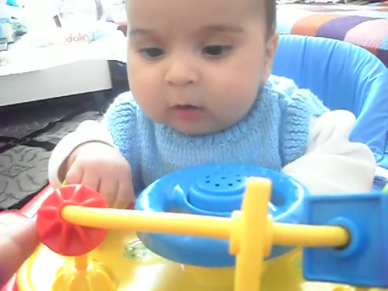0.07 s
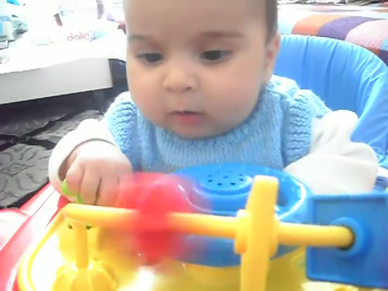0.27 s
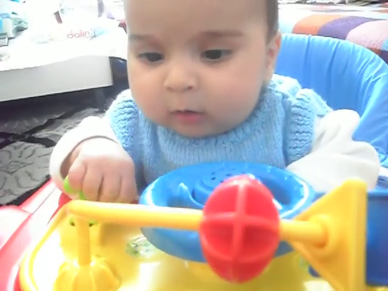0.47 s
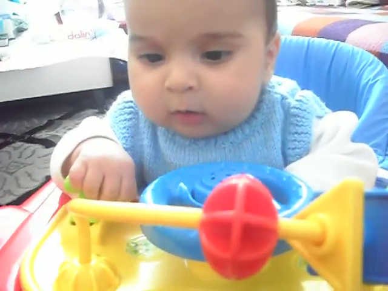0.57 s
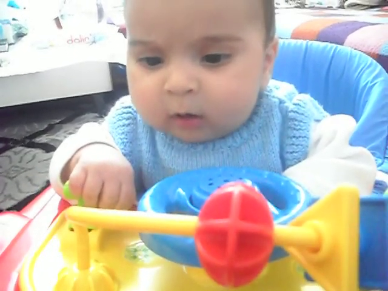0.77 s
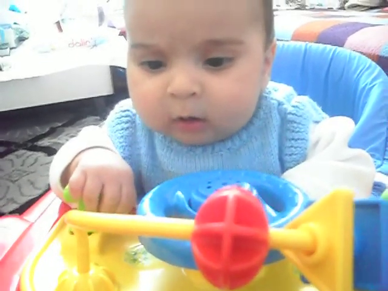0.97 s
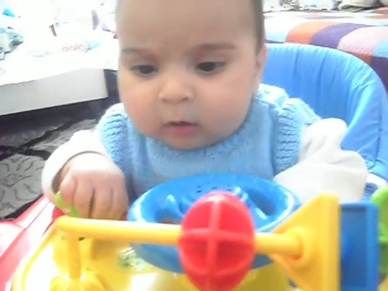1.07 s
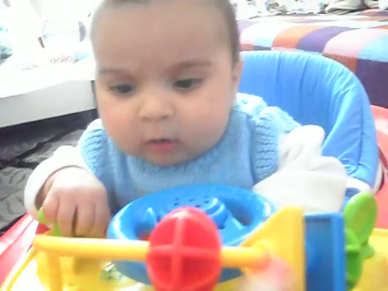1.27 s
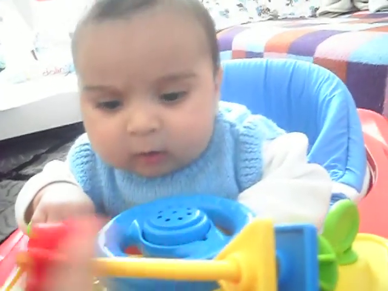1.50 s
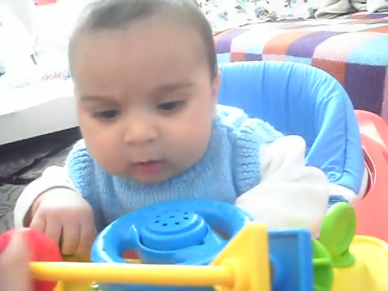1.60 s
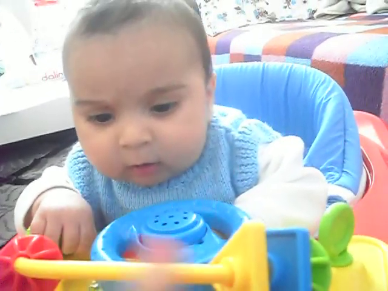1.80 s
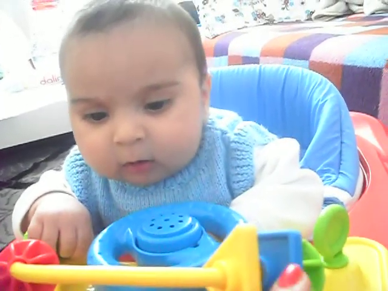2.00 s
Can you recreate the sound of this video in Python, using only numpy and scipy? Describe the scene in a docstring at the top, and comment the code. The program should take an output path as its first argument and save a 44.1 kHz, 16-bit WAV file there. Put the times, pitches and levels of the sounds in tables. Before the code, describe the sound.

Plastic bead sliding on a baby toy, clattering with two sharp snaps, then rattling back.

```python
"""A camera's faint hiss, thin whine and electrical flutter at its frame rate sound throughout.
Close by, a plastic bead is flicked along the bar of a baby's toy tray, snaps against its neighbours
and the end stop, and is later pushed back. Its friction and impacts drive the resonant modes of the
hollow tray, and a small furnished room adds a short reverberation."""
import sys
import numpy as np
from scipy import signal
from scipy.fft import rfft, irfft
from scipy.io import wavfile
from scipy.ndimage import uniform_filter1d

SR = 44100
rng = np.random.default_rng(int(sys.argv[2]) if len(sys.argv) > 2 else 0)


def transcribe(signal):
    """Save signal, clipped to [-1, 1], as a 16-bit WAV file at the path in sys.argv[1]."""
    frames = np.atleast_2d(signal).T
    limited = np.clip(frames, -1, 1)
    pcm = np.round(limited * 32767).astype(np.int16)
    wavfile.write(sys.argv[1], SR, pcm)


N = 90404

# Spectrum of the room's bright reverberation. Each row: frequency in Hz, relative level in dB.
BRIGHT_REVERB = [(400, -26), (900, 1), (1800, 1.5), (4500, 5.5), (7000, -2.5), (10000, -1)]


def from_db(db):
    """Amplitude grows tenfold for every 20 dB."""
    return 10 ** (np.asarray(db) / 20)


def rms_one(x):
    """Normalisation to unit mean power."""
    return x / np.sqrt(np.mean(x ** 2) + 1e-20)


def coloured(spectrum, size):
    """Spectral shaping of white noise, at unit rms."""
    hz, db = np.transpose(spectrum)
    bin_hz = np.fft.rfftfreq(size, 1 / SR)
    gain = from_db(np.interp(np.log(bin_hz + 1), np.log(hz), db))
    return rms_one(irfft(rfft(rng.standard_normal(size)) * gain, size))


def noise_band(hz, width_hz):
    """Band-pass filtering of white noise, at unit rms."""
    band = signal.butter(2, [hz - width_hz / 2, hz + width_hz / 2], "band", fs=SR, output="sos")
    return rms_one(signal.sosfilt(band, rng.standard_normal(N)))


def ring(force, hz, t60):
    """A damped oscillator answers an impulse with a sine that falls 60 dB in t60 seconds."""
    decay, step = from_db(-60 / (t60 * SR)), 2 * np.pi * hz / SR
    return signal.lfilter([0, np.sin(step)], [1, -2 * decay * np.cos(step), decay ** 2], force + 1e-18)


def diffuse(x, spectrum, t60):
    """Densely overlapping modes act as a convolution with decaying noise of unit energy."""
    tail = coloured(spectrum, size=SR // 2) * from_db(-60 * np.arange(SR // 2) / SR / t60)
    return signal.fftconvolve(x, tail / np.linalg.norm(tail))[:N]


def delayed(x, s):
    """A propagation delay of s seconds."""
    return np.pad(x, (int(s * SR), 0))[:N]


def click(s, db):
    """An ideal impulse at s seconds excites all frequencies equally."""
    return from_db(db) * (np.arange(N) == int(s * SR))


def camera_noise(frame_hz=29.97, first_burst_s=0.0109, burst_s=0.012):
    """Periodic interference adds a throb and a burst of fizz at each frame to steady hiss and whine."""
    # Hiss and rumble. Each row: frequency in Hz, relative spectral density in dB.
    hiss_spectrum = [(15, -3), (40, -7), (90, -7.5), (200, -12.5), (300, -16.5), (420, -23), (1500, -29),
                     (4000, -32.5), (7500, -35), (9300, -30), (10200, -38), (11000, -52), (12000, -59)]
    # Each row: multiple of the frame rate, peak level in dB.
    hum_harmonics = [(1, -43.5), (2, -51), (4, -69)]
    # Each row: frequency in Hz, rms level in dB.
    whine_tones = [(7140, -66.5), (7870, -73.5)]
    t = np.arange(N) / SR
    frames = (t - first_burst_s) * frame_hz
    hum = sum(from_db(db) * np.cos(2 * np.pi * k * frames) for k, db in hum_harmonics)
    in_burst = np.abs(frames - np.round(frames)) < burst_s * frame_hz / 2
    gate = uniform_filter1d(in_burst.astype(float), size=64)
    fizz = from_db(-59) * noise_band(8990, width_hz=630)
    flutter = from_db(-59.5) * noise_band(224, width_hz=155)
    whine = sum(from_db(db) * np.sqrt(2) * np.sin(2 * np.pi * hz * t) for hz, db in whine_tones)
    hiss = from_db(-50.5) * coloured(hiss_spectrum, size=N)
    return hiss + hum + gate * (fizz + flutter) + whine


def slide(envelope, bright_hz, thin_hz, catches_per_s=1100, spread_db=3):
    """Stick-slip friction: the bead catches on the bar in tiny random impulses that ring the tray."""
    s, db = np.transpose(envelope)
    level = from_db(np.interp(np.arange(N) / SR, s, db, left=-120, right=-120))
    catches = (rng.random(N) < catches_per_s / SR) * rng.choice([-1, 1], N)
    strengths = from_db(spread_db * np.clip(rng.standard_normal(N), -2, 2))
    force = contact(catches * strengths * level, bright_hz, thin_hz)
    return rms_one(tray([force])) * np.sqrt(np.mean(level ** 2))


def contact(force, bright_hz, thin_hz, crisp_db=-33.5):
    """Contact filters a force: a soft one loses nearly all its treble, a light one stirs little bass."""
    soft = signal.butter(2, bright_hz, fs=SR)
    light = signal.butter(1, thin_hz, "high", fs=SR)
    cushioned = signal.lfilter(*soft, force + 1e-18)
    return signal.lfilter(*light, cushioned - from_db(crisp_db) * force)


def tray(forces, spots=5, spread_db=4.5):
    """Modal superposition: each force rings the tray in a random mix, as its point of contact varies."""
    # Modes of the tray and its bar. Each row: frequency in Hz, gain in dB, 60 dB decay time in seconds.
    tray_modes = [(260, -17, 0.11), (469.8, -14, 0.21), (500, -5.5, 0.029), (637, -8, 0.026),
                  (809, -6, 0.019), (931, -11, 0.031), (1182, -16, 0.017), (1355, -26, 0.025),
                  (1495, -12, 0.029), (1773, -22, 0.032), (2032, -19.5, 0.045), (2132, -13.5, 0.017),
                  (2650, -30, 0.017), (3570, -12.5, 0.004)]
    # The plastic's dense overtones. Each row: frequency in Hz, relative spectral density in dB.
    overtone_spectrum = [(150, -5), (400, 1.5), (900, 0.5), (1600, -1.5), (2300, -3.5), (3000, -8.5),
                         (5000, -6.5), (7000, -9.5), (10000, -3)]
    coupling = from_db(spread_db * rng.standard_normal((len(forces), len(tray_modes))))
    drives = coupling.T @ np.array(forces)
    ringing = sum((-1) ** ((k + 1) // 2) * from_db(db) * ring(drives[k], hz, t60)  # signs flip in pairs
                  for k, (hz, db, t60) in enumerate(tray_modes))
    overtones = sum(diffuse(sum(forces[spot::spots]), overtone_spectrum, t60=0.016)
                    for spot in range(min(spots, len(forces))))
    radiation = signal.butter(4, 216, "high", fs=SR, output="sos")  # a small shell radiates little bass
    return signal.sosfilt(radiation, ringing + from_db(18.5) * overtones)


def knocks(rebound_s=0.00302, rebound_db=-7):
    """Inelastic impact: the loose bead hits the bar and stops, rebounding once after an uneven delay."""
    # Each row: start in seconds, strength in dB, treble cutoff in Hz, bass cutoff in Hz.
    bead_impacts = [(0.2027, -25.5, 850, 408), (0.2108, -29.5, 600, 250), (.2325, -23, 1310, 700),
                    (0.2484, -18.5, 1420, 400), (.2625, -16.5, 1950, 720), (0.2729, -26, 5140, 1300),
                    (0.3361, -20, 2200, 203), (0.3396, -17.5, 2150, 410), (.352, -19.5, 2200, 500),
                    (.3665, -22, 1480, 300), (.3765, -22.5, 1600, 393), (0.3874, -26, 2180, 296),
                    (0.4034, -14.5, 1970, 125), (.429, -25.5, 1610, 500), (0.445, -26, 1230, 304),
                    (1.3759, -32.5, 1610, 600), (1.4029, -33.5, 1560, 700), (1.413, -33.5, 3000, 704),
                    (1.4321, -23.5, 2380, 250), (1.442, -30, 6400, 1290), (1.529, -28, 2630, 1190),
                    (1.5376, -32, 1460, 800), (1.545, -31, 4870, 1290), (1.5695, -35, 1400, 800),
                    (1.576, -22.5, 1410, 890), (1.591, -26.5, 1280, 700), (1.6006, -38, 1700, 790),
                    (1.618, -17.5, 1140, 990), (1.6222, -18.5, 1080, 900), (1.6556, -34, 1190, 600),
                    (1.6985, -28, 920, 401), (1.7064, -21.5, 2600, 690), (1.7100, -15.5, 820, 314),
                    (1.7255, -27.5, 1160, 500), (1.747, -33, 720, 300)]
    gaps = rebound_s * rng.uniform(0.502, 1.306, len(bead_impacts))
    return tray([contact(click(s, db) + click(s + gap, db + rebound_db), bright_hz, thin_hz)
                 for (s, db, bright_hz, thin_hz), gap in zip(bead_impacts, gaps)])


def snaps(t60=0.0025):
    """Hard impact excites the bead's own brief modes; early reflections and a short sizzle follow."""
    # Plastic edges meet at the bar's end. Each row: start in seconds, level in dB, low, middle and
    # edge modes in Hz, the edge mode's relative level in dB and its 60 dB decay time in seconds.
    hard_impacts = [(0.3347, -10, 3870, 5500, 9400, -0.5, 0.0017),
                    (.402, -8.5, 3100, 5470, 7080, 0.5, 0.0045)]
    # Reflections from near surfaces. Each row: delay in seconds, gain in dB.
    near_reflections = [(.0028, -14.5), (.0083, -19.5), (0.014, -22)]
    direct, blows = np.zeros((2, N))
    for s, db, low_hz, middle_hz, edge_hz, edge_db, edge_t60 in hard_impacts:
        blow = click(s, db)
        direct += ring(blow, low_hz, t60) - ring(blow, middle_hz, t60)
        direct += from_db(edge_db) * ring(blow, edge_hz, edge_t60)
        blows += blow
    force = contact(blows, bright_hz=10600, thin_hz=3000)
    sizzle = from_db(0.5) * diffuse(force, BRIGHT_REVERB, t60=0.15)
    echoes = sum(from_db(db) * delayed(direct, s) for s, db in near_reflections)
    return direct + sizzle + echoes


def wisp(peak_s=1.103, half_width_s=0.01):
    """A Gaussian envelope on narrow-band noise gives one faint, high fizz while the bead rests."""
    swell = np.exp(-((np.arange(N) / SR - peak_s) / half_width_s) ** 2)
    return from_db(-57) * swell * noise_band(9900, width_hz=990)


def room(x):
    """Diffuse reverberation, which lasts longer in the low range than in the high."""
    # Spectrum of the dark reverberation. Each row: frequency in Hz, relative level in dB.
    dark_reverb = [(150, 1.5), (280, 2), (470, -1.5), (800, -1), (1500, -18.5), (3000, -24)]
    low = from_db(-25.5) * diffuse(x, dark_reverb, t60=0.35)
    high = from_db(-10.5) * diffuse(x, BRIGHT_REVERB, t60=0.24)
    return delayed(low + high, s=0.004)


def microphone(x, edge_hz=10000, shelf_db=-24.5):
    """A shelving response: the top treble falls away to a low, level remainder."""
    low_pass = signal.butter(12, edge_hz, fs=SR, output="sos")
    return signal.sosfilt(low_pass, x) + from_db(shelf_db) * x


def scene():
    """Superposition of the toy, its reverberation and the background noise, in one channel."""
    # Rubbing envelopes of the flick out and the push back. Each row: time in seconds, level in dB.
    outward_envelope = [(.188, -59), (.202, -37), (.225, -41.5), (.27, -30), (.295, -57), (.33, -49),
                        (.345, -37.5), (.395, -38), (.44, -55), (.46, -75)]
    return_envelope = [(1.36, -57), (1.47, -53), (1.515, -51.5), (1.535, -33), (1.56, -49), (1.6, -38),
                       (1.63, -40.5), (1.69, -51), (1.72, -35), (1.77, -67)]
    body = knocks()
    body += slide(outward_envelope, bright_hz=3000, thin_hz=600)
    body += slide(return_envelope, bright_hz=1370, thin_hz=935)
    cracks = snaps()
    toy = body + cracks + room(body + from_db(-8) * cracks)
    return (microphone(toy) + camera_noise() + wisp())[None]


def record(dry):
    """Band limiting: an elliptic low-pass cuts steeply above 12200 Hz."""
    return signal.sosfilt(signal.ellip(10, 0.1, 80, 12200, fs=SR, output="sos"), dry)


dry = scene()
out = record(dry)
transcribe(out)
```